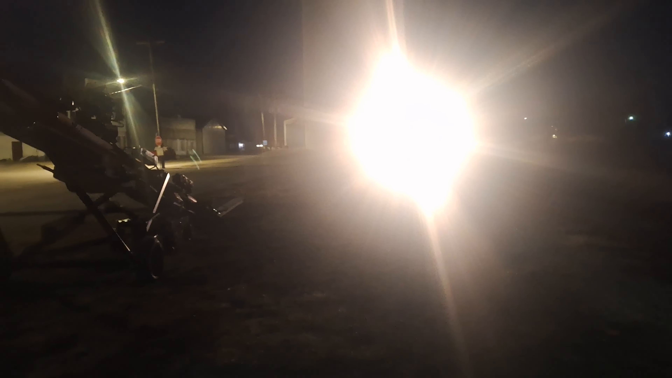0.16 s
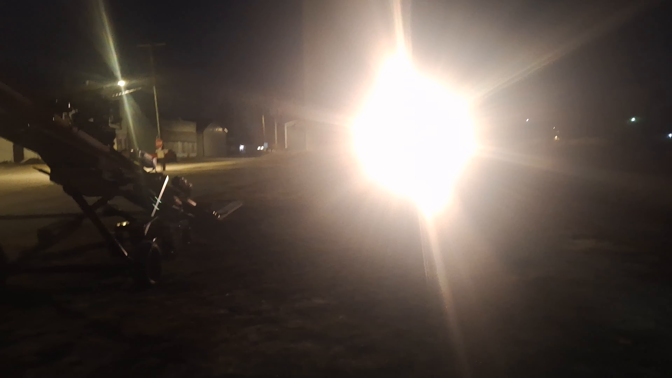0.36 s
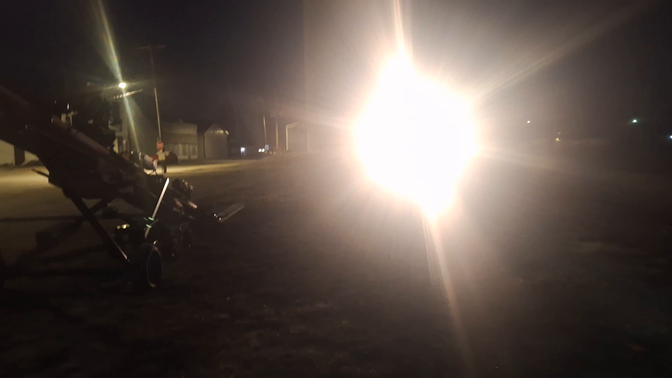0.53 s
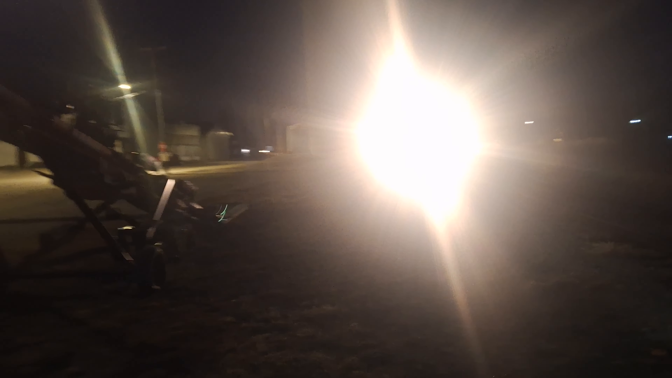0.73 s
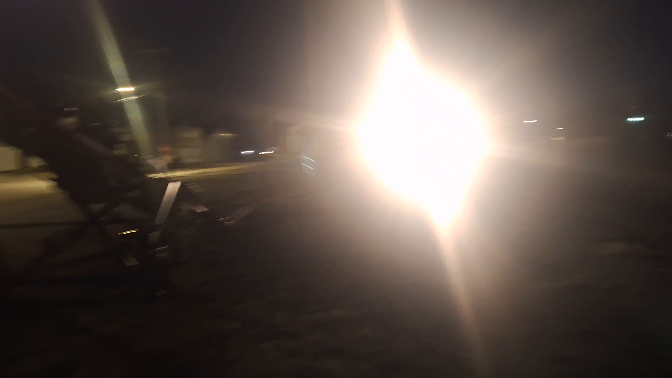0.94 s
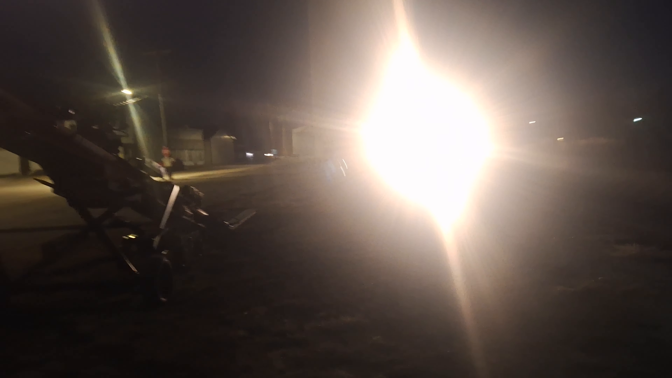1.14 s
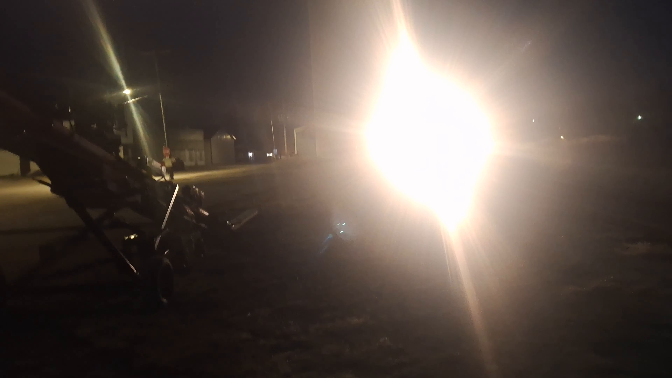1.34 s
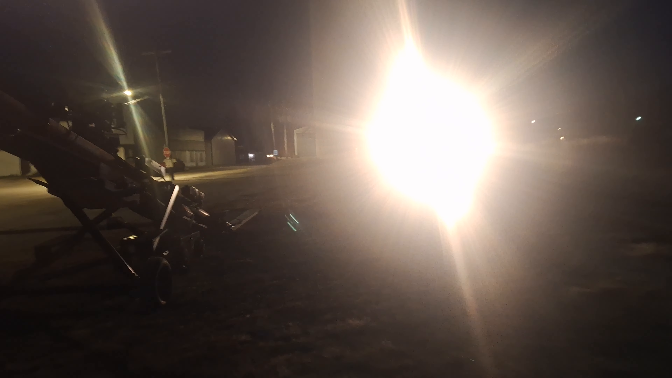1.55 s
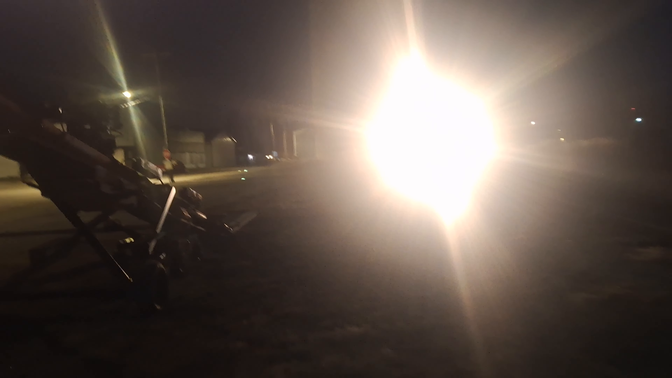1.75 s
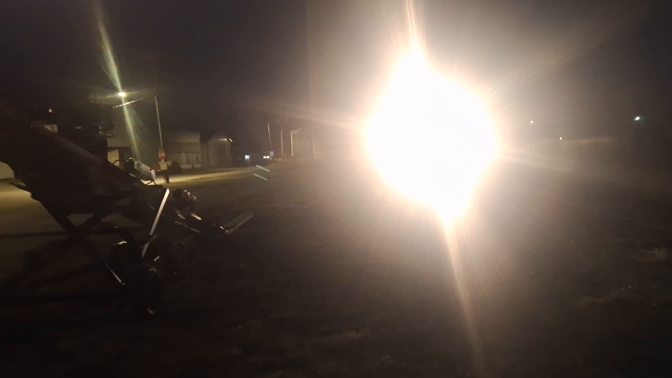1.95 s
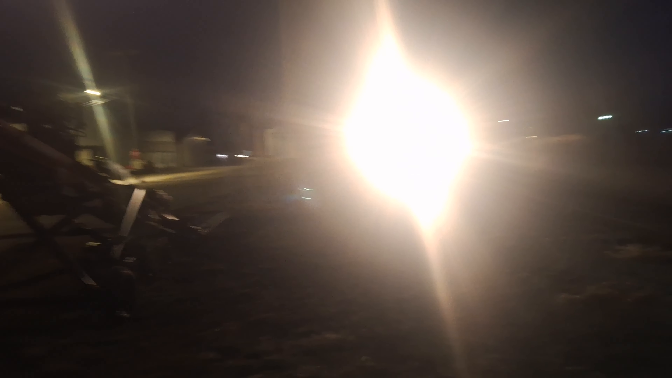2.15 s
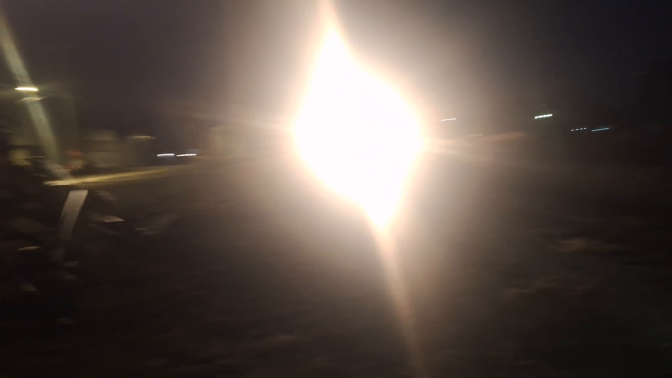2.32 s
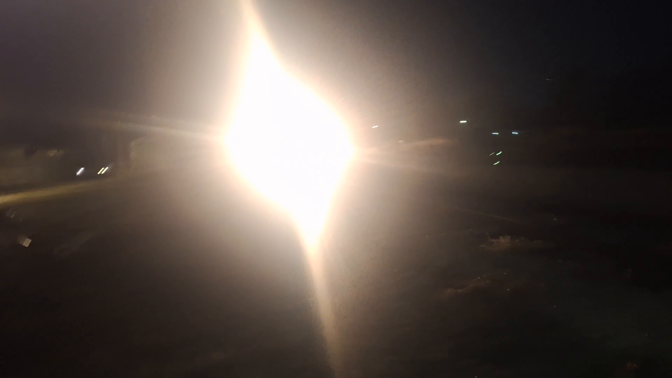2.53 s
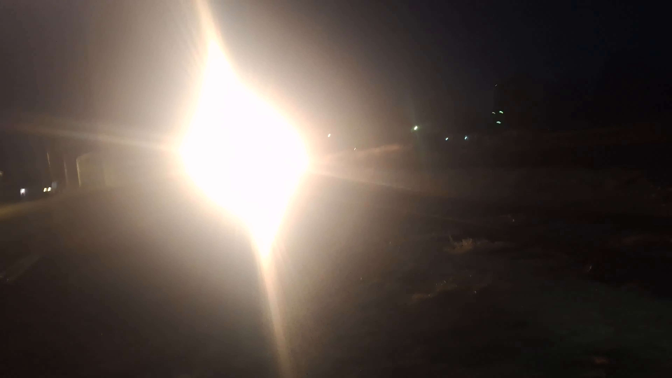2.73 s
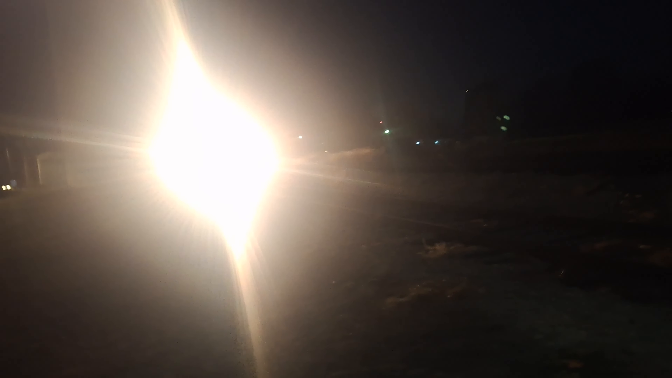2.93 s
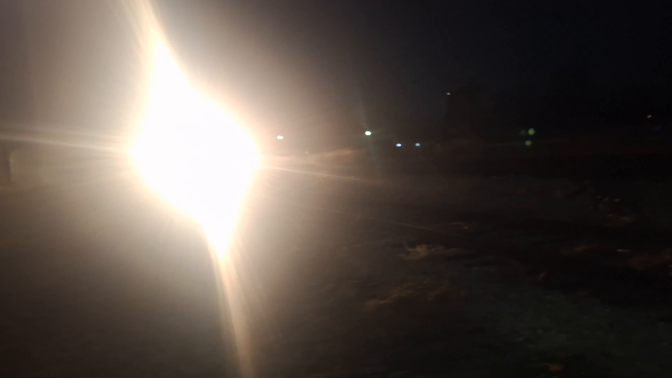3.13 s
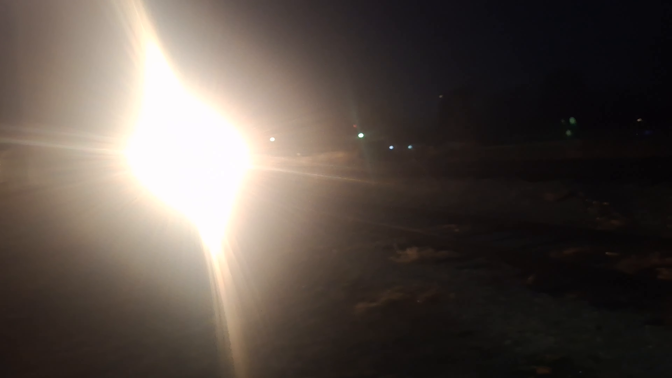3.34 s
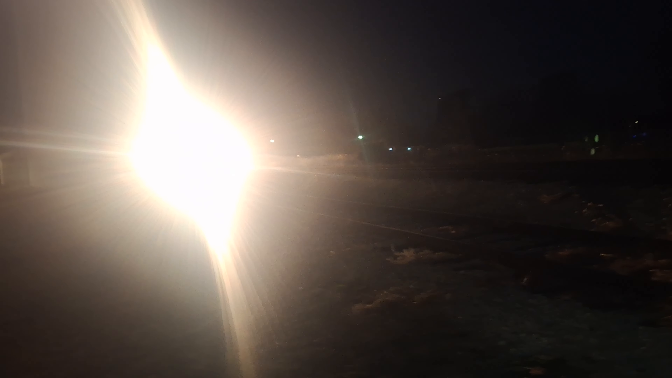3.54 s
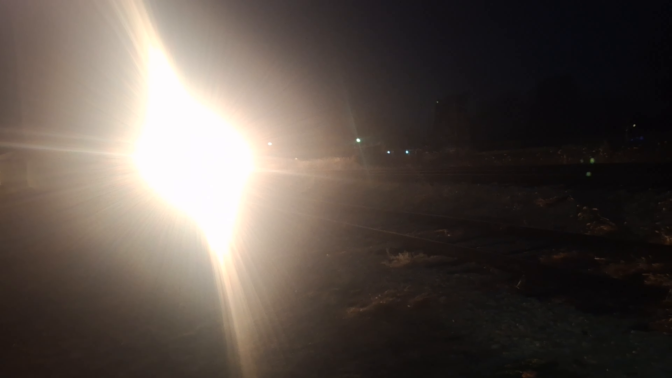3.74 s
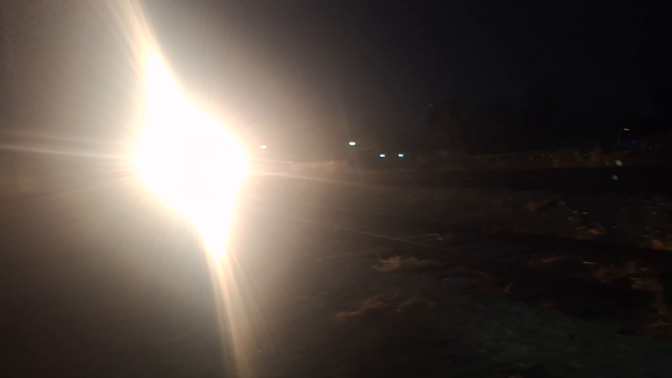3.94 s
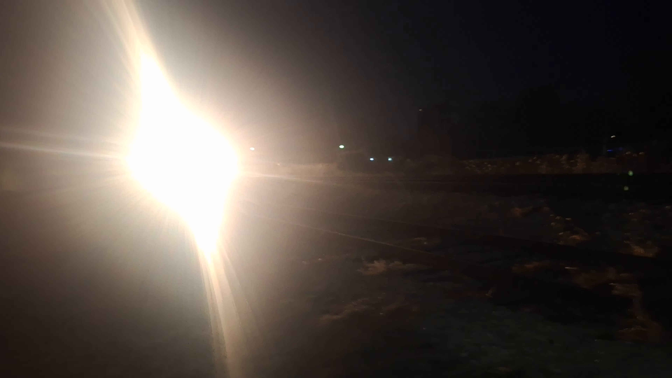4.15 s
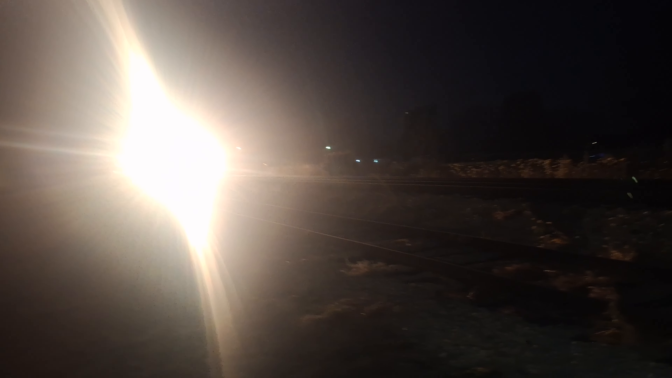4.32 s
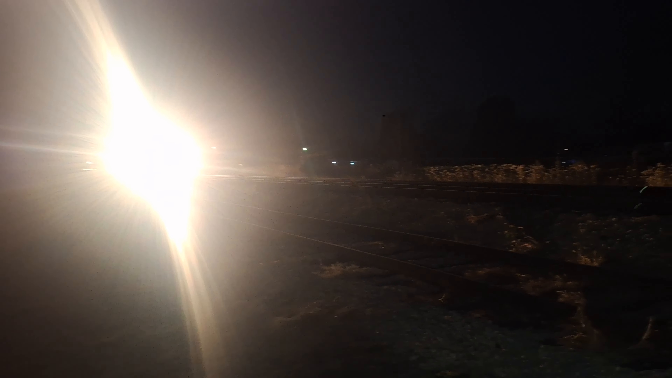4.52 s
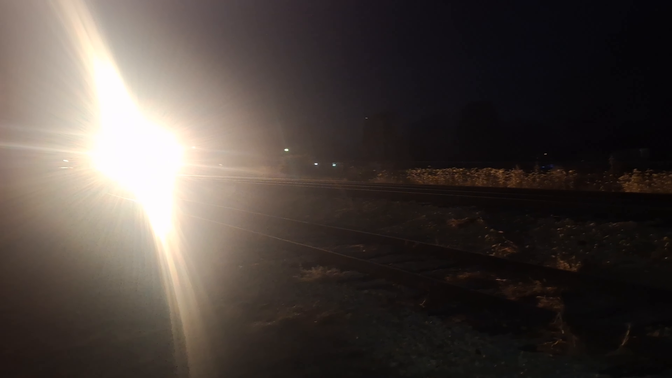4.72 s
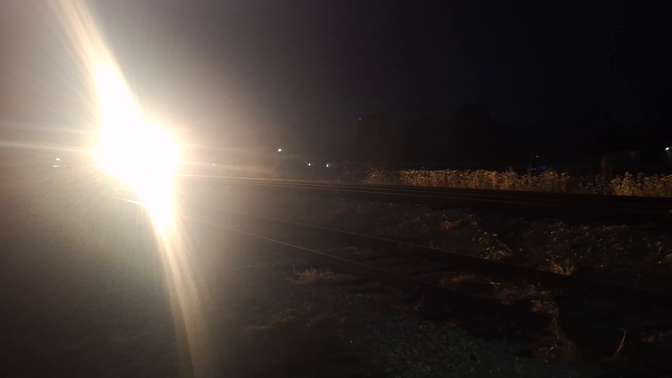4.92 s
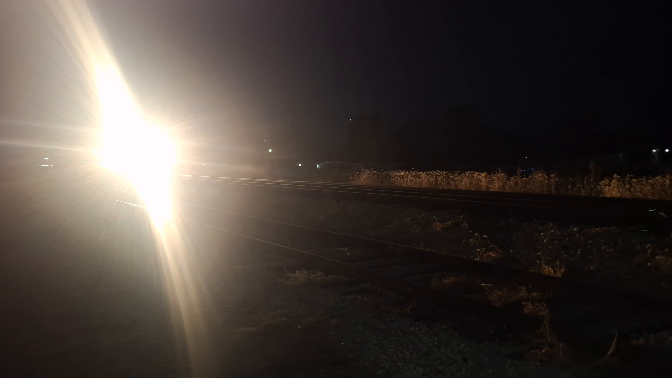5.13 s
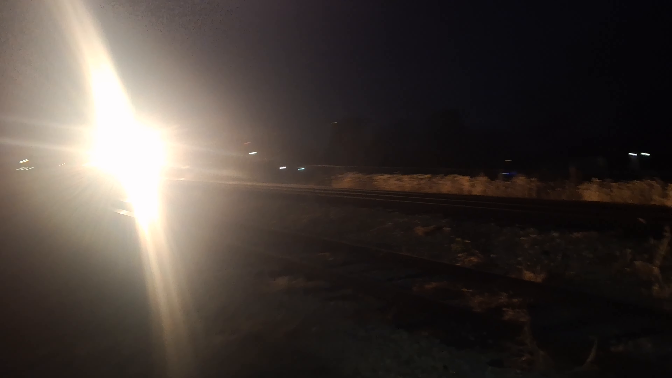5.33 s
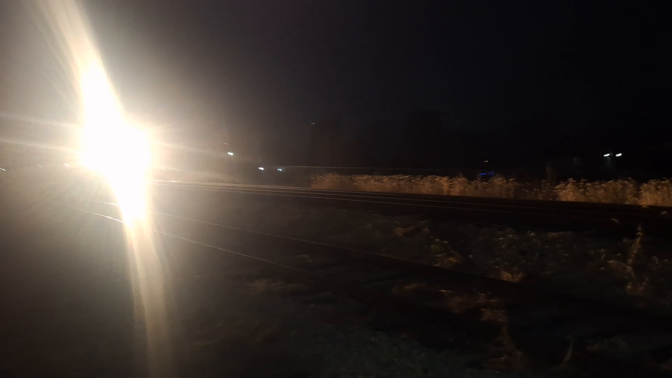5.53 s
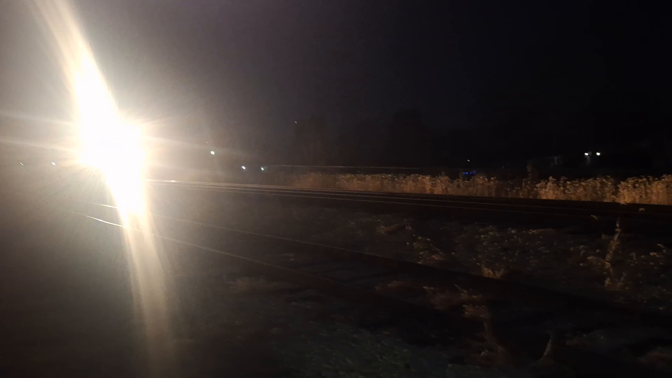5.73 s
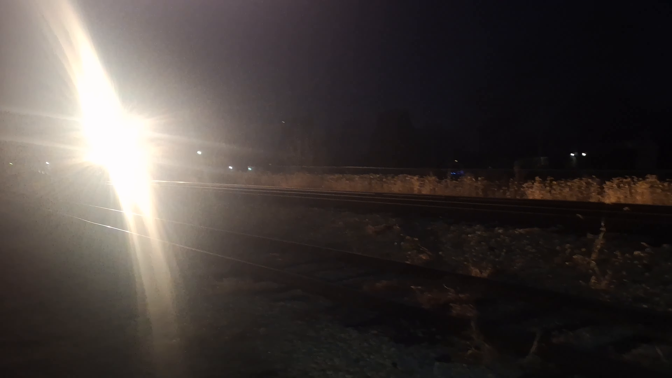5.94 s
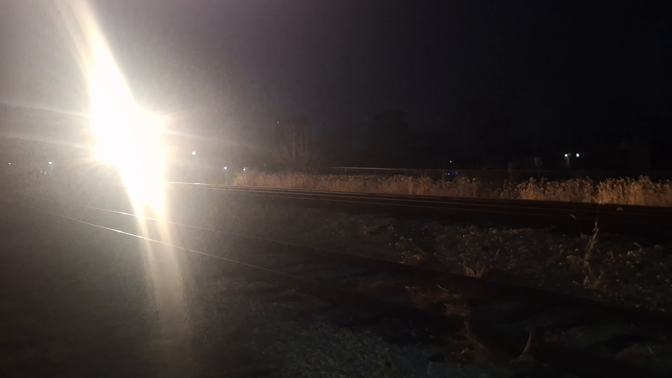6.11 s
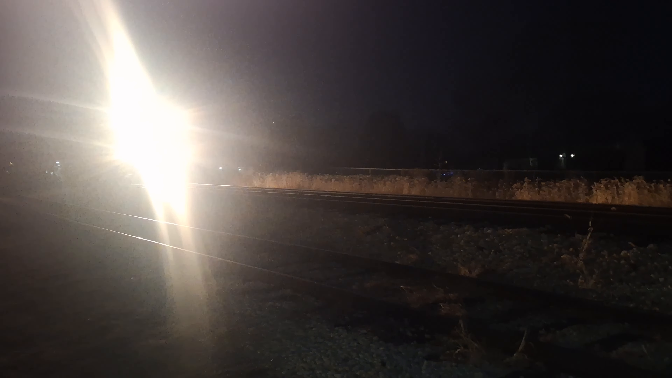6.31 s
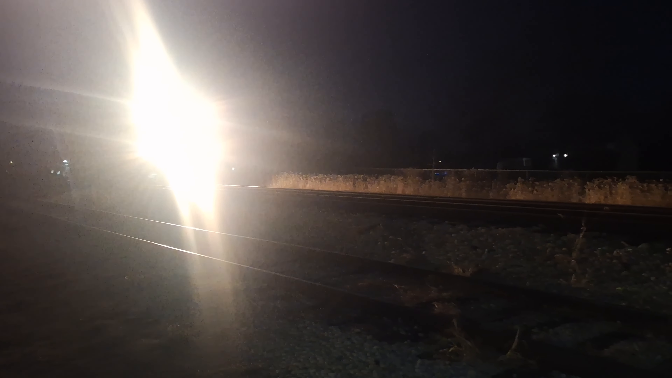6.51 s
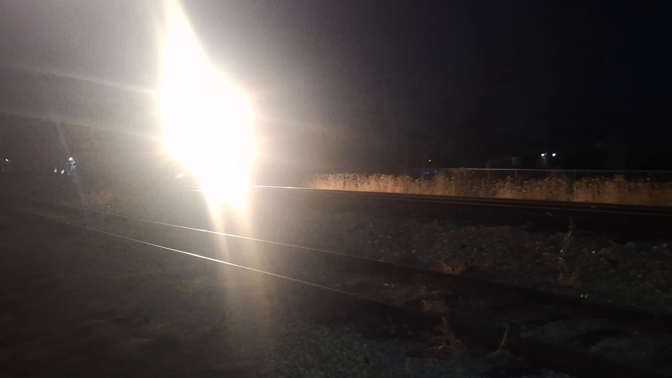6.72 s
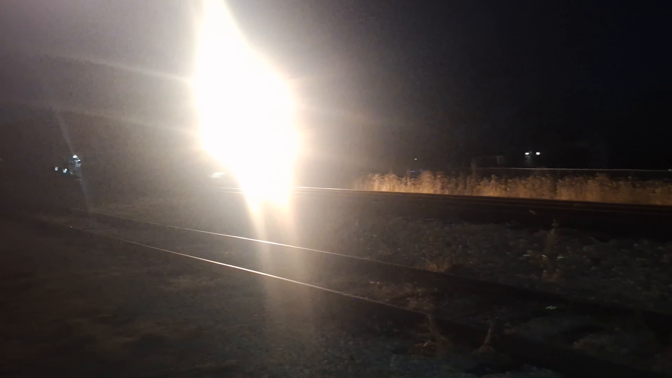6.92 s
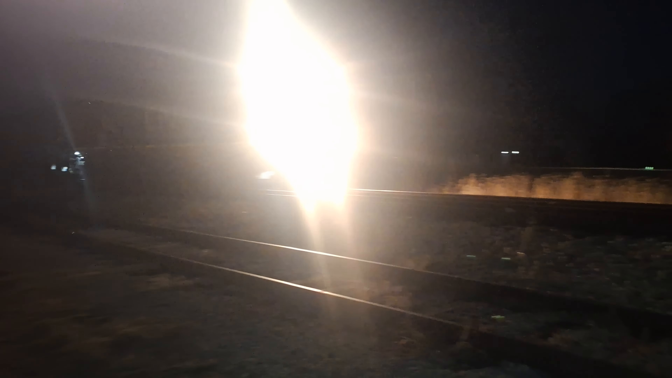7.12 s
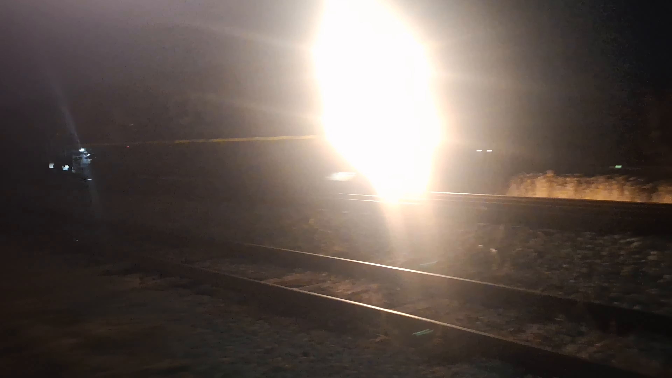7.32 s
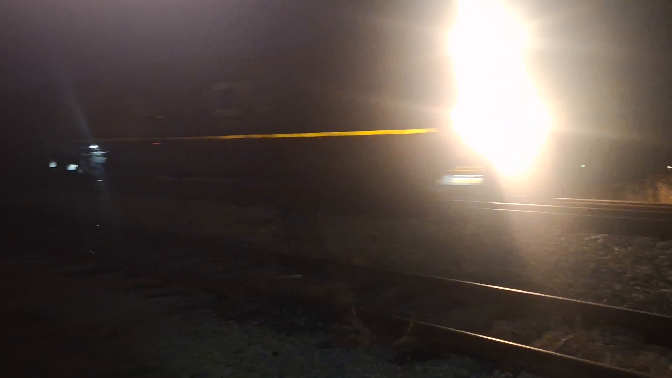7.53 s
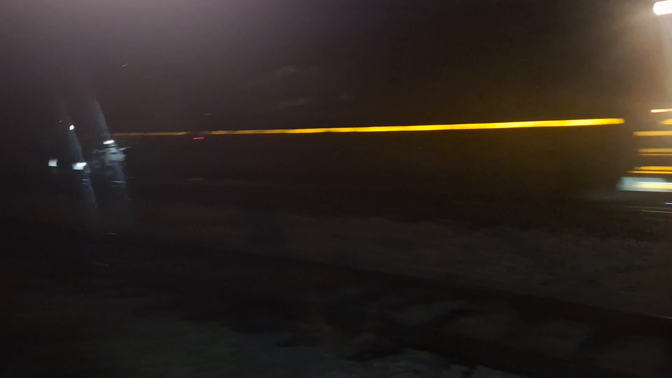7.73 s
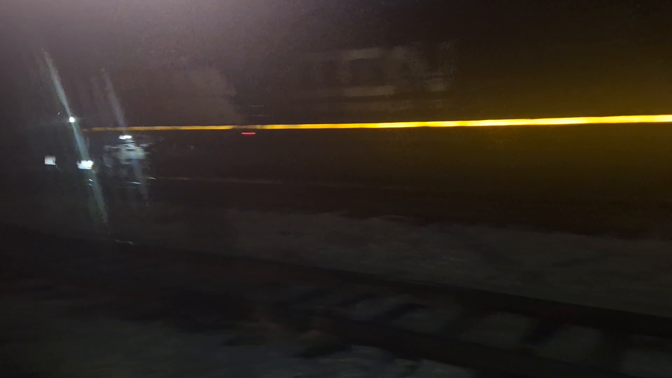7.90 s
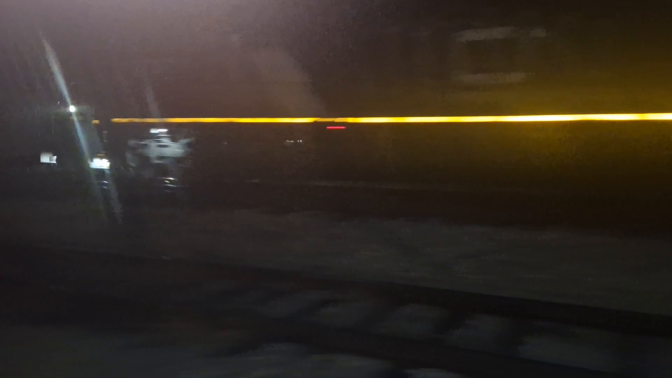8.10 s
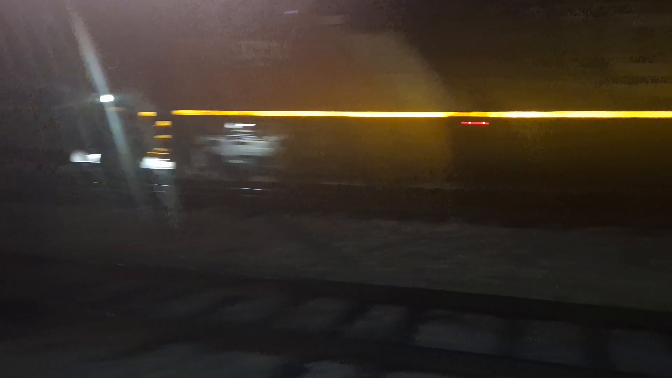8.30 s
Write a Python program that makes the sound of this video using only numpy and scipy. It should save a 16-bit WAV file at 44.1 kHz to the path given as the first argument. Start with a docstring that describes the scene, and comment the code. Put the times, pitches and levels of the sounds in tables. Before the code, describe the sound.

Beside a night railway, two throbbing diesel locomotives approach with a deep beating drone, rails sizzling faintly, then roar past with wheel noise and knocks.

```python
"""Night, close beside a railway track: a low sine drone fades within seconds as a hand bumps the microphones.
From afar two idling diesels throb as sums of crank-cycle sines that beat, with stack boom and puffing gas noise.
Surges of high noise sizzle in the rails; shaped noise makes the fans, wheel roar, ring and hiss, and rail tones.
The train rolls up and these swell, with decaying noise bursts as clanks now and then.
As the engines draw level the hood resonances stand out, their pitch sinks and the knocks come deep and close."""
import sys
import numpy as np
from scipy import signal
from scipy.fft import rfft, irfft, next_fast_len
from scipy.io import wavfile
from scipy.ndimage import map_coordinates

SR = 44100
rng = np.random.default_rng(int(sys.argv[2]) if len(sys.argv) > 2 else 0)


def master_out(mix):
    """Clip the mix to full scale and print it as 16-bit PCM to the path in sys.argv[1]."""
    frames = np.transpose(np.atleast_2d(mix))
    ceiling = np.clip(frames, -1, 1)
    pcm = np.round(ceiling * 32767).astype(np.int16)
    wavfile.write(sys.argv[1], SR, pcm)


N = 368676

# Engine speed as heard at the track. Each row: time in seconds, firing rate of one bank in Hz.
ENGINE_SPEED = [(0, 53.35), (4.5, 53.28), (6.5, 53.15), (7.3, 52.95), (7.9, 51.9), (8.36, 50.9)]
# Uneven cylinders. Each row: multiple of the four-stroke cycle rate, strength of that line in relative dB.
UNEVEN_CYLINDERS = [(7, -24.7), (9, -12.6), (10, -12.2), (11, -12.1), (12, -15.1), (13, -24.2), (14, -24.2),
                    (16, -26.3), (17, -23.2), (19, -30.8), (23, -36.1), (24, -36.6), (25, -34.7),
                    (26, -36.6), (30, -37.7)]
# Exhaust as the stack nears and passes.
# Each row: time in seconds, then firing notes, throb, stack boom and gas rush, each in dB.
EXHAUST_LEVELS = [(0, -20, -27.5, -39.5, -40), (1.15, -13.5, -26, -32.5, -39),
                  (1.8, -16.5, -26, -36.5, -37.5), (3.4, -14, -23, -31, -36), (5.2, -14.5, -23, -30.5, -33),
                  (6.1, -11.5, -22, -31.5, -30.5), (7.05, -14.5, -23.5, -27.5, -29),
                  (7.5, -9, -19, -22, -26), (7.8, -14.5, -27, -29, -29), (8.36, -17, -33, -29.5, -29)]
# Moments in seconds at which the two firing notes oppose; one engine slips one firing between neighbours.
OPPOSED_S = [0.451, 1.01, 2.499, 3.15, 3.83, 4.43, 4.87, 5.48, 6.3, 6.872, 7.34, 8.701]
# Steady low drone that fades early. Each row: time in seconds, level in dB before trim.
DRONE_LEVEL = [(0, -33), (.55, -33), (1.2, -50), (2, -54.5), (8.36, -58.5)]
# Angle of the train to the microphones. Each row: time in seconds, nearness from 0 (head-on) to 1 (broadside).
NEARNESS = [(0, 0.078), (4.3, 0), (6.3, 0.71), (7.5, 0.98), (8.36, 0.98)]
# Roar of the approach. Each row: time in seconds, fans and wheels, each in dB before trim.
ROAR_LEVELS = [(0, -46.5, -55), (.35, -46, -53), (.8, -50, -55.5), (1.35, -50.5, -57), (3.6, -52.3, -54.5),
               (4.8, -48.5, -53), (5.6, -45.5, -48.5), (6.7, -39.5, -47.5), (7.42, -34, -39.5),
               (8.05, -36, -41), (8.36, -38, -40.5)]
# Close sounds of the wheels. Each row: time in seconds, ring and tread hiss, each in dB before trim.
TREBLE_LEVELS = [(0, -80.5, -82), (1.3, -84.5, -93.5), (2.3, -74.5, -79.5), (3.6, -74.5, -87),
                 (4.7, -64, -76.5), (6.5, -58.5, -69), (7.45, -52.5, -58), (8.36, -51, -52)]
# Surges of sizzle in the rails. Each row: start in seconds, length in seconds, level in dB before trim.
SIZZLE_SURGES = [(0.004, 0.2, -47.5), (0.687, 0.066, -51.5), (0.982, 0.07, -50.5), (1.24, 0.092, -51.5),
                 (1.353, 0.05, -53), (1.505, 0.087, -52), (1.998, 0.03, -53.5), (2.035, 0.102, -51),
                 (2.271, 0.058, -52), (2.613, 0.083, -49), (2.774, 0.044, -56), (2.88, 0.044, -50),
                 (3.063, 0.03, -53.5), (3.352, 0.092, -52), (3.464, 0.042, -54), (3.715, 0.162, -49),
                 (4.029, 0.032, -53), (4.197, 0.048, -53), (4.591, 0.35, -50.5), (5.142, 0.074, -51.5),
                 (5.453, 0.22, -46.5), (5.726, 0.21, -49.5), (5.964, 0.053, -52), (6.716, 0.033, -53.5),
                 (6.763, 0.032, -54), (7.161, 0.128, -51.5), (7.338, 0.03, -52.5), (7.596, 0.11, -51),
                 (7.739, 0.184, -53.5), (7.933, 0.036, -54), (8.244, 0.12, -48)]
# Rail tones rung by the treads. Each row: peak moment in seconds, pitch in Hz, length in seconds, level in dB.
RAIL_TONES = [(3.65, 14600, .4, -63), (4.203, 14750, .2, -59.5), (5.115, 7050, 0.075, -67),
              (5.346, 3770, 0.14, -58), (5.499, 3560, 0.12, -57), (5.87, 14470, 0.1, -66.5),
              (6.041, 3890, 0.15, -59.5), (6.653, 3850, 0.27, -60.5), (7.651, 4740, 0.26, -56),
              (7.844, 4240, .04, -49), (7.89, 3420, 0.058, -54), (8.3, 4430, 0.035, -47)]
# Running gear knocks. Each row: start in seconds, level in dB, centre in Hz, 60 dB decay time in seconds.
CLANKS = [(.412, -50, 3300, .035), (1.639, -52.5, 2170, 0.52), (2.52, -56.5, 2760, 1.1),
          (5.246, -42, 2550, 0.29), (5.28, -42.5, 2980, 0.4), (6.281, -40.5, 1870, 0.48),
          (6.291, -51.5, 4780, 0.36), (7.479, -30.5, 663, 0.2), (7.81, -24, 772, 0.069),
          (7.949, -30.5, 1260, 0.14), (8.0, -32, 620, 0.3)]
# A hand bumps the microphones and its sleeve brushes past.
# Each row: peak moment in seconds, level in dB before panning, centre in Hz, length in seconds.
BRUSHES = [(0.06, -67, 6070, 0.098), (0.082, -38.5, 420, 0.0075), (0.114, -41.5, 980, 0.01),
           (1.593, -39, 850, 0.0025), (2.143, -42, 271, .045), (2.189, -60.5, 4500, 0.09),
           (2.187, -59, 10170, 0.13)]
# Hood resonances that stand out up close. Each row: centre in Hz, width in Hz, strength in relative dB.
HOOD_MODES = [(636, 58, -8.5), (700, 80, -7), (1237, 60, -6), (1930, 150, -18.5), (2580, 98, -20),
              (3080, 50, -26)]

# Noise colours: exhaust gas, fans and wheels head-on and broadside, wheel ring, tread hiss,
# rail sizzle and its lower bending waves. Each row: frequency in Hz, density in relative dB per Hz.
GAS_COLOUR = [(25, -12.5), (40, -13), (55, -7.5), (80, 2), (112, 5), (140, -0.5), (190, -4), (250, -11.5),
              (320, -18.5), (390, -27), (900, -70)]
FANS_FAR = [(330, -28.5), (420, -10.5), (520, -1), (640, 4), (760, 1.5), (880, -1), (1020, -6),
            (1600, -48.5)]
FANS_NEAR = [(230, -15), (350, -13), (460, -2), (600, -1), (740, -1.5), (840, -8.5), (980, -15.5),
             (1600, -41.5)]
WHEELS_FAR = [(700, -18), (950, -5.5), (1120, -0.5), (1270, 1), (1550, -1.5), (1950, -0.5), (2200, -2.5),
              (2520, -2.5), (2850, -10), (3250, -12.5), (3700, -27.5), (5000, -54)]
WHEELS_NEAR = [(750, -30), (1000, -3.5), (1150, -0.5), (1270, 0.5), (1450, -3.5), (1680, -4.5), (2020, 0),
               (2250, -4.5), (2500, -3), (2900, -11), (3300, -15.5), (3800, -27.5), (5000, -45)]
RING_COLOUR = [(2200, -27), (3000, -0.5), (3800, 1.5), (4500, -4.5), (5600, -13.5), (7500, -32.5)]
HISS_COLOUR = [(3500, -15), (5500, -1.5), (7500, 0.5), (10000, -5.5), (13000, -7.5), (15800, -15)]
RAIL_COLOUR = [(11000, -47.5), (12800, -19), (13500, -6), (14100, -2), (15000, 0.5), (15800, -6.5)]
RAIL_LOW_COLOUR = [(9500, -34.5), (11000, -9.5), (12500, 2.5), (13300, -3), (14500, -9.5)]
# Likeness of the left and right microphones. Each row: frequency in Hz, coherence (1 alike, 0 unrelated).
ALIKE = [(100, 1), (250, 0.92), (500, 0.69), (750, 0.5), (1100, -0.26), (2000, -0.16), (4000, 0),
         (12000, 0)]

STRONG_STROKE_S = 7.847  # a moment at which the strongest cylinders fire; they return once a cycle
SECOND_DB, SECOND_GAINS_DB_PER_S = -17, 2.22  # rear note against the front one at the start; gain as it nears
SECOND_THROB_DB = -12.5  # rear throb against the front one
LOPE_DEPTH, LOPE_FOCUS = .5, 3.2  # once-a-cycle swell when broadside; how sharply it keeps to that angle
SURGE_TRIM_DB, SURGE_ATTACK_S, SURGE_RELEASE_S = -2.5, .015, .045
SURGE_SAG_DB_PER_S, SURGE_FLICKER_DB = 13, 0.8  # loss as a surge ages; its random swing
BED_DB, BED_NEAR_DB, BED_FLICKER_DB = -62, -0.5, 4.5  # between surges: head-on, change broadside, random swing
LOW_WAVES_DB, LOW_WAVES_DB_PER_S = -25, 2.5  # lower rail waves at the start; gain as the train nears
TOP_HZ = 15850  # band limit of the microphones


def amp(db):
    """Decibels to gain."""
    return 10 ** (np.asarray(db) / 20)


def unit(x):
    """Scale to rms 1."""
    return x / np.sqrt(np.mean(x ** 2) + 1e-20)


def clock():
    """Time of every sample in seconds."""
    return np.arange(N) / SR


def along(points, hz):
    """Read a (Hz, value) curve on a log frequency axis."""
    f, v = np.transpose(points)
    return np.interp(np.log(hz + 1), np.log(f + 1), v)


def curves(rows):
    """One value per sample for each column after the time."""
    s, *columns = np.transpose(rows)
    return [np.interp(clock(), s, column) for column in columns]


def nearness():
    """From 0 head-on to 1 broadside, for every sample."""
    return np.clip(curves(NEARNESS)[0], 0, 1)


def wobble(rate):
    """A smooth random curve with rate knots a second."""
    knots = rng.standard_normal(int(N * rate / SR) + 4)
    return map_coordinates(knots, [clock() * rate])


def filtered(x, response):
    """Shape x by a response given as a function of frequency."""
    m = next_fast_len(N + SR // 4)
    return irfft(rfft(x, m) * response(np.fft.rfftfreq(m, 1 / SR)), m)[..., :N]


def pan(left_db):
    """Gains of the two channels, the left stronger than the right by left_db."""
    return amp([[left_db / 2], [-left_db / 2]])


def rush(spectrum, ripple_db=0):
    """Stereo noise, alike in the bass and unrelated in the treble; ripple = a thicket of steel modes."""
    thicket = rng.standard_normal(SR // 100 + 4)

    def response(hz):
        turn = np.arccos(np.clip(along(ALIKE, hz), -1, 1)) / 2
        ripple = ripple_db * map_coordinates(thicket, [hz / 50])  # one knot per 50 Hz
        return amp(along(spectrum, hz) + ripple) * [np.cos(turn), np.sin(turn)]

    mid, side = filtered(rng.standard_normal((2, N)), response)
    return np.array([mid + side, mid - side]) / np.std(mid)


def approach(far, near):
    """Noise whose colour turns from head-on to broadside at even power."""
    share = nearness()
    return np.sqrt(1 - share) * rush(far) + np.sqrt(share) * rush(near)


def band(centre_hz, spread):
    """A second of stereo noise around one frequency, as alike left and right as that frequency allows."""
    edges = np.clip([centre_hz / (1 + spread), centre_hz * (1 + spread)], 20, SR / 2 - 100)
    bandpass = signal.butter(2, edges, 'bandpass', fs=SR, output='sos')
    noise = signal.sosfilt(bandpass, rng.standard_normal((3, SR)))
    alike = np.clip(along(ALIKE, centre_hz), 0, 1)
    return unit(np.sqrt(alike) * noise[2] + np.sqrt(1 - alike) * noise[:2])


def add(out, s, sound):
    """Mix a short sound in from time s; what falls outside the scene is dropped."""
    start = round(s * SR)
    sound = sound[:, max(-start, 0):]
    part = out[:, max(start, 0):][:, :sound.shape[-1]]
    part += sound[:, :part.shape[1]]


def engines():
    """Both exhausts: beating firing notes, throb, stack boom and gas that leaves in puffs, over a low drone."""
    firing_hz, = curves(ENGINE_SPEED)
    note_db, throb_db, boom_db, gas_db = curves(EXHAUST_LEVELS)
    front = crank(firing_hz)
    rear = slipping(front)

    firing = cycle_line(front, order=8)
    swell = 1 + LOPE_DEPTH * nearness() ** LOPE_FOCUS * np.cos(front)
    second = amp(SECOND_DB + SECOND_GAINS_DB_PER_S * clock()) * cycle_line(rear, order=8)
    notes = amp(note_db) * unit(swell * (firing + second))

    front_throb = throb(front, unsteady_db=4.0)
    rear_throb = amp(SECOND_THROB_DB) * throb(rear, unsteady_db=3.5)
    lope = amp(throb_db + 2.1 * wobble(9)) * unit(front_throb + rear_throb)

    boom = amp(boom_db + 1.3 * wobble(6)) * unit(cycle_line(front, order=15))
    puffs = unit(1 + .25 * firing)
    gas = amp(gas_db) * puffs * rush(GAS_COLOUR)
    hum = unit(np.sin(2 * np.pi * 127 * clock() + .5 * wobble(6)))
    drone = amp(curves(DRONE_LEVEL)[0] - 2.0) * hum
    return notes + lope + boom + gas + drone


def crank(firing_hz, count=8):
    """Angle of the four-stroke cycle, in which count cylinders of a bank fire; zero at the strongest stroke."""
    angle = 2 * np.pi * np.cumsum(firing_hz) / SR / count
    return angle - np.interp(STRONG_STROKE_S, clock(), angle)


def slipping(angle, count=8):
    """The rear engine's crank: it loses one firing from each opposition to the next."""
    lost = np.interp(clock(), OPPOSED_S, np.arange(len(OPPOSED_S)) + .5)
    # carry the first slip rate back to the start
    lost -= np.maximum(OPPOSED_S[0] - clock(), 0) / (OPPOSED_S[1] - OPPOSED_S[0])
    return angle - 2 * np.pi * lost / count


def cycle_line(angle, order):
    """One multiple of the cycle rate; the exhaust duct shifts each differently, smearing beats into a churn."""
    return np.sin(order * angle + 2 * (order - 8) * (order - 9))


def throb(angle, unsteady_db):
    """Unequal cylinders add lines on both sides of the firing note, each wavering in level."""
    lines = [amp(db + unsteady_db * wobble(2)) * cycle_line(angle, order=k) for k, db in UNEVEN_CYLINDERS]
    return unit(sum(lines))


def fans():
    """Radiator fans and engine-room roar, pulsing slightly at the firing rate; hood modes emerge up close."""
    fans_db, _ = curves(ROAR_LEVELS)
    pulse = unit(1 + 0.065 * np.sin(8 * crank(curves(ENGINE_SPEED)[0])))

    def modes(f):
        return sum(amp(db) * 1j * f * width / (centre ** 2 - f ** 2 + 1j * f * width)
                   for centre, width, db in HOOD_MODES)

    inside = rush([(300, -29.0), (550, 2.5), (3200, -7.0), (5000, -22.0)])  # Hz, relative dB per Hz
    hood = amp(-2) * nearness() ** 2 * unit(filtered(inside, modes))
    roar = approach(FANS_FAR, FANS_NEAR) * pan(0.28) + hood
    return amp(fans_db - 1.0 + 0.85 * wobble(14)) * pulse * roar


def wheels():
    """Rolling steel: the roar carries far; ring and gritty hiss only come through up close."""
    _, roar_db = curves(ROAR_LEVELS)
    ring_db, hiss_db = curves(TREBLE_LEVELS)
    contact = wobble(25)  # rough patches of the tread stir every band together
    roar = amp(roar_db - 1.0 + .5 * contact) * approach(WHEELS_FAR, WHEELS_NEAR) * pan(4.9)
    ring = amp(ring_db + 2.5 + .8 * contact) * rush(RING_COLOUR, ripple_db=2.5) * pan(-0.77)
    grit_db = .7 * contact + .7 * wobble(150)
    hiss = amp(hiss_db + 2.2 + grit_db) * rush(HISS_COLOUR, ripple_db=2.5) * pan(-2.4)
    return roar + ring + hiss


def rails():
    """High bending waves run far ahead of the wheels: surges of sizzle and brief narrow tones."""
    low_waves = amp(LOW_WAVES_DB + LOW_WAVES_DB_PER_S * clock()) * rush(RAIL_LOW_COLOUR)
    colour = rush(RAIL_COLOUR, ripple_db=1.0) + low_waves
    crackle = amp(1.5 * wobble(30) + 1.6 * wobble(220))
    out = surges() * crackle * colour * pan(-11.5)
    t = np.arange(SR) / SR - .5
    for s, hz, length, db in RAIL_TONES:
        swell = np.exp(-2 * (t / length) ** 2)
        add(out, s - .5, amp(db) * swell * band(hz, spread=0.009))
    return out


def surges():
    """Gain of the sizzle: each surge rises fast, sags and dies away over a flickering bed."""
    t = clock()
    gain = amp(BED_DB + BED_NEAR_DB * curves(NEARNESS)[0] + BED_FLICKER_DB * wobble(12))
    flicker_db = SURGE_FLICKER_DB * wobble(14)
    for s, length, db in SIZZLE_SURGES:
        span = (t > s - .1) & (t < s + length + .5)
        age = t[span] - s
        outside = np.maximum(-age, 0) / SURGE_ATTACK_S + np.maximum(age - length, 0) / SURGE_RELEASE_S
        sag_db = SURGE_SAG_DB_PER_S * np.maximum(age, 0)
        level_db = db + SURGE_TRIM_DB + flicker_db[span] - sag_db
        gain[span] = np.maximum(gain[span], amp(level_db) * np.exp(-outside))
    return gain


def clanks():
    """Couplers and bogies knock: a fast rise, then a short rattle in one band."""
    out, t = np.zeros((2, N)), np.arange(SR) / SR
    for s, db, hz, t60 in CLANKS:
        rise = 1 - np.exp(-t / 0.0016)
        add(out, s, amp(db - 60 * t / t60) * rise * band(hz, spread=0.27))
    return out


def handling():
    """Small handling bumps and soft swells of cloth noise, nearer the right microphone."""
    out, t = np.zeros((2, N)), np.arange(SR) / SR - .5
    for s, db, hz, length in BRUSHES:
        swell = 1 / (1 + (2 * t / length) ** 2)
        add(out, s - .5, amp(db) * swell * band(hz, spread=0.32))
    return out * pan(-6.0)


def scene():
    """Everything heard beside the track."""
    return engines() + fans() + wheels() + rails() + clanks() + handling()


def record(dry):
    """The right microphone rolls off the bass sooner than the left; nothing passes the band limit."""
    corner_hz = np.array([[25], [60]])  # left, right
    return filtered(dry, lambda hz: 1j * hz / (corner_hz + 1j * hz) * (hz < TOP_HZ))


dry = scene()
out = record(dry)
master_out(out)
```